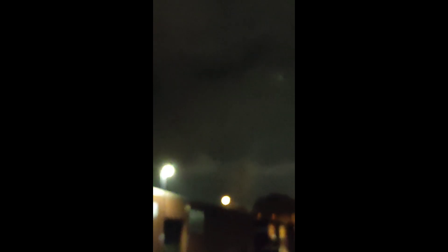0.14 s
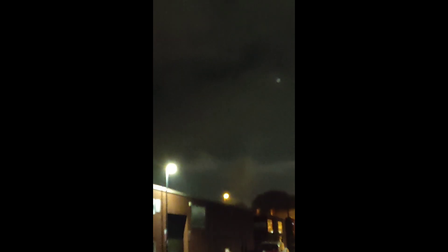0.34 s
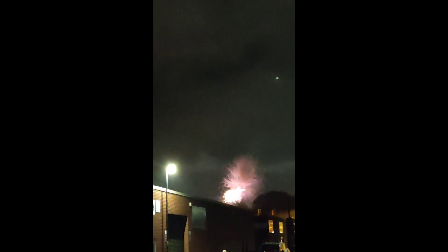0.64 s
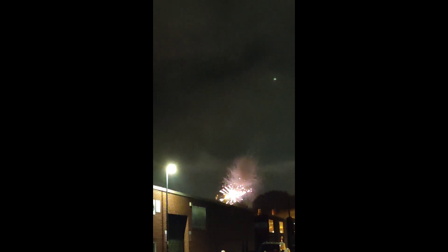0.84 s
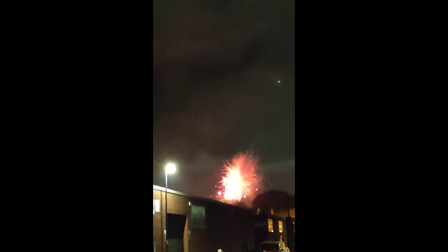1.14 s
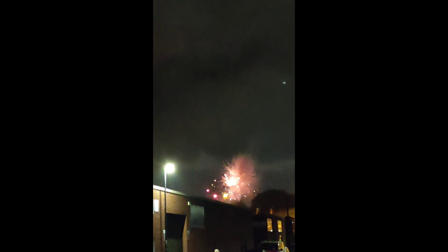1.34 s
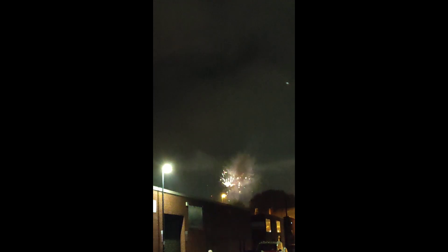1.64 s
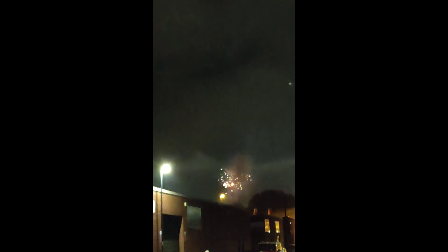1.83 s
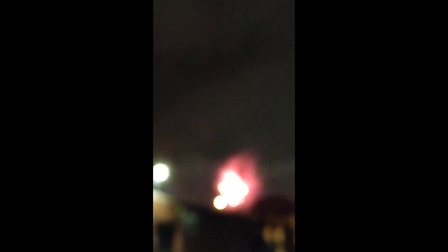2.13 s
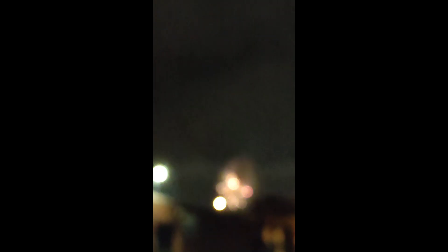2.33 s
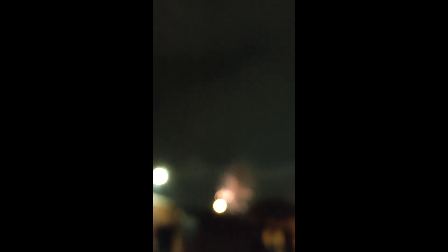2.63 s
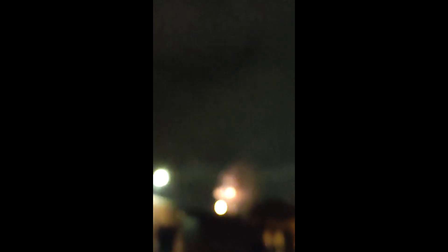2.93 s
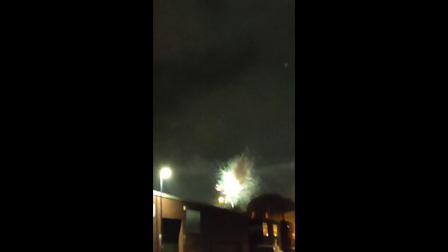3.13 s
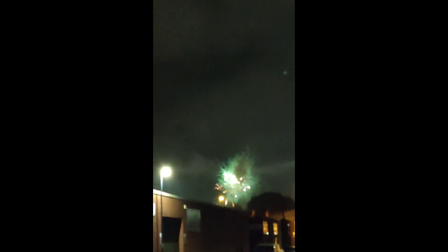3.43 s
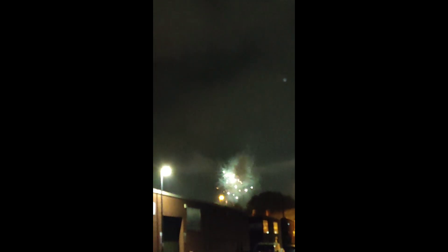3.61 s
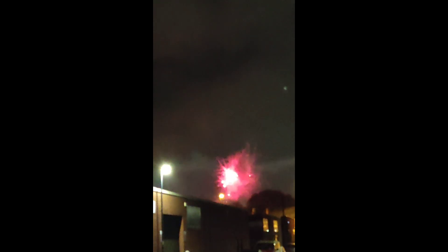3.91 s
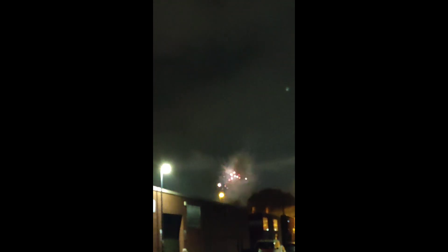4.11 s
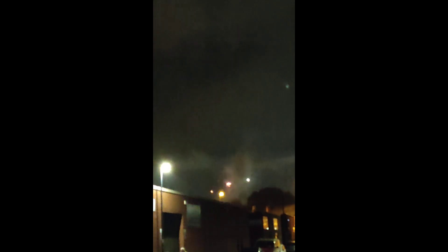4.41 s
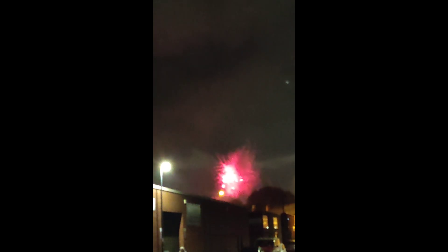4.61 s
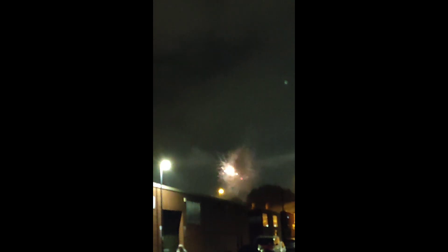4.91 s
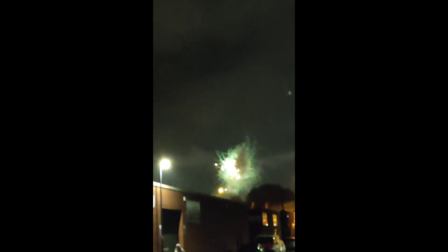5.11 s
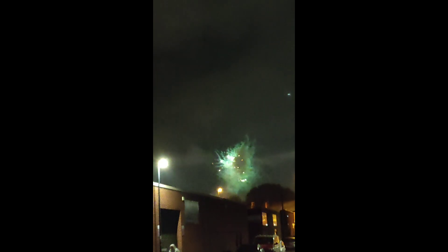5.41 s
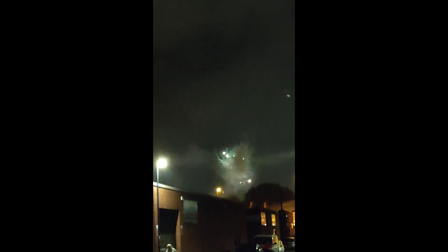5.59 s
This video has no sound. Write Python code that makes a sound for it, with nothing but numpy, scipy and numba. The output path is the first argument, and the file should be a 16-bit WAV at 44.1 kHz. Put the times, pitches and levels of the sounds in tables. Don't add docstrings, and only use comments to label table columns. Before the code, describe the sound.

Fireworks burst over a town at night with hard bangs, echoes off houses and crackling stars, above a low idling engine.

```python
import sys
import numpy as np
from scipy import signal
from scipy.fft import rfft, irfft, next_fast_len
from scipy.io import wavfile
from scipy.ndimage import uniform_filter1d, map_coordinates
from numba import njit

SR = 44100
rng = np.random.default_rng(int(sys.argv[2]) if len(sys.argv) > 2 else 0)


def log_audio(samples):
    frames = np.atleast_2d(samples).T
    limited = np.clip(frames, -1, 1)
    pcm = np.round(limited * 32767).astype(np.int16)
    wavfile.write(sys.argv[1], SR, pcm)


def how_loud(loudness_db):
    steps = np.asarray(loudness_db, float) / 20
    return 10 ** steps


N = 253575

# (time [s], peak [dB], overpressure [ms], echo strength
# [dB])
BIG_SHELLS = [
    (1.4376, -3.5, 0.34, 3),
    (1.4612, -0.5, 0.48, -1),
    (1.9545, -4, 0.4, 2),
    (2.784, -2.5, 0.36, 2),
    (3.4281, -3.5, 0.37, 3.5),
    (3.878, -3.5, 0.43, 2.5),
    (4.5938, -3, 0.42, 2.5),
    (5.3365, -3.5, 0.42, 3.5),
]
# (delay [ms], left level [dB], right level [dB])
CLOSE_WALLS = [
    (.5, -16, -10),
    (2.1, -21, -10),
    (3.25, -28, -14),
    (4.45, -30, -15),
    (5.0, -22, -22),
]
# (delay [ms], level [dB], spread [ms])
HOUSE_ROWS = [(13.15, -16.5, 1.2), (24, -9, 9.6), (44.8, -14.5, 2.7), (47.3, -37, 6.6), (60.6, -59, 0.67),
              (76.8, -17, 2.4), (89.7, -24, 1.4), (101, -15, 13), (129, -28, 7.6), (156, -23, 23),
              (165, -48, 3.7), (181, -29, 7.4), (188.4, -26, 0.78), (252, -34, 0.43), (259.4, -28, 1.2),
              (268, -32, 6.3)]
# (frequency [Hz], gain [dB])
ROOF_AIR = [(60, -5), (200, -5), (1000, -5), (3000, -3), (7000, -6.5), (14000, 9.5)]
# (time [s], peak [dB], overpressure [ms], ground echo
# delay [ms])
SMALL_CHARGES = [(0.0084, -15.5, 0.34, 1.46), (0.0179, -22.8, 0.26, 1.43), (0.5135, -12.5, 0.28, 0.86),
                 (0.5412, -24, 0.38, 1.12), (0.9038, -17, 0.35, 1.5), (1.2257, -14, 0.31, 1.6),
                 (1.6722, -13, 0.35, 1.44), (2.195, -14, 0.29, 1.34), (2.2186, -12, 0.3, 0.74),
                 (2.3357, -19.5, 0.32, 0.93), (2.5125, -14, 0.35, 1.5), (2.7109, -16.0, 0.32, 1.4),
                 (3.5259, -19, 0.48, 1.64), (3.5415, -12, 0.31, 1.27), (3.8098, -25.7, 0.33, 1.56),
                 (4.1375, -30, 0.39, 2.3), (4.1656, -13, 0.34, 1.67), (4.1852, -16.5, 0.32, 1.15),
                 (4.2089, -25, 0.44, 1.3), (4.635, -41, 0.44, 1.7), (4.974, -16.5, 0.29, 1.52),
                 (5.4037, -13, 0.33, 1.5), (5.4919, -16.5, 0.2, 1.44)]
# (delay [ms], level under the shell [dB], overpressure [ms], ground echo delay [ms])
HOUSE_FRONTS = [
    (14, -13, 0.45, 1.48),
    (79, -25.5, 0.067, 1.17),
    (103, -16, 0.6, 1.56),
    (182, -56, 0.42, 1.702),
]
# (delay [ms], peak [dB])
TALL_WALL = [
    (47, -40),
    (47, -40),
    (22.3, -20),
    (24.3, -6),
    (27.9, -16.5),
    (27.3, -8),
    (23.5, -14),
    (24.7, -11),
]
# (time [s], peak [dB])
CLEAR_STARS = [(0.1374, -20.5), (0.2131, -24), (0.2775, -24.5), (0.3458, -21), (0.3823, -55),
               (0.4196, -26.5), (0.4459, -24), (0.7611, -26), (1.8204, -20), (1.8945, -23.5), (1.9154, -30),
               (2.1732, -27), (2.4605, -21.5), (2.564, -19.5), (2.6066, -18.5), (2.6407, -20.5),
               (2.7399, -19), (3.1651, -24), (3.2322, -25), (3.2936, -24), (3.3349, -22), (3.3769, -23),
               (5.0578, -17), (5.1019, -19), (5.151, -17), (5.2102, -20.5), (5.2594, -16.5), (5.315, -22),
               (5.5967, -21.5), (5.7389, -22)]
# (time [s], peak [dB])
MORE_STARS = [(5.0117, -26), (5.0237, -22), (5.048, -26), (5.0965, -36), (5.1194, -23), (5.1284, -22),
              (5.1456, -20), (5.158, -25), (5.1727, -21), (5.1806, -22), (5.1952, -21.5), (5.205, -20.5),
              (5.2285, -25), (5.236, -20.5), (5.2692, -22), (5.2795, -18), (2.3929, -26.5), (2.771, -16),
              (2.5933, -23), (2.6876, -23.5), (2.7184, -23), (3.2573, -23.5), (3.3639, -27),
              (3.688, -22.5), (0.8313, -30), (1.1052, -30), (1.181, -35), (1.307, -34), (4.2586, -25.5),
              (4.835, -19)]
# (burst time [s], roll level [dB], star shower level [dB])
LEFT_BEHIND = [
    (-0.24, -29.5, -42),
    (0.3, -66, -48.5),
    (1.45, -28, -39),
    (1.955, -32.5, -43),
    (2.784, -31, -46.5),
    (3.43, -33.5, -66),
    (3.878, -33, -74),
    (4.594, -33, -42),
    (5.336, -32, -44.5),
]
# (frequency [Hz], level [dB per Hz])
ROLL_COLOUR = [(200, -27), (320, -1), (600, 0), (1000, -0.5), (1600, -7), (3000, -34.5), (6000, -35),
               (10000, -35.5)]
# (frequency [Hz], level [dB per Hz])
SWARM_COLOUR = [(700, -30), (1200, -5), (2000, -11), (3200, -1.5), (4500, -20), (7000, -21), (9000, -35),
                (14300, -42)]
# (frequency [Hz], likeness [0 to 1])
LIKENESS = [(60, 0.85), (180, 0.96), (550, 0.96), (1650, 0.31), (4970, 0.062), (15000, 1)]
# (time [s], firing rate [Hz])
IDLE_SPEED = [(0.0, 27.08), (0.53, 26.35), (1.31, 27.49), (1.41, 26.44), (1.58, 27.13), (2.35, 26.31),
              (3.68, 26.76), (3.92, 26.34), (4.82, 27.58), (5.75, 26.9)]
# (multiple of the firing rate [-], level [dB])
ENGINE_TONES = [(1, -2), (2, -3.5), (3, 2), (4, -5.5), (5, -24), (6, -2.5), (7, 0.5), (8, -5.5), (9, -55),
                (10, -15)]
# (frequency [Hz], level [dB per Hz])
EXHAUST_COLOUR = [(20, -43), (40, -2), (62, -15), (80, -13), (130, -7), (190, -4.5), (260, -11.5),
                  (500, -25.5), (1000, -59.5)]
# (time [s], firing rate [Hz], level [dB])
FAR_VEHICLE = [
    (0, 46, -50),
    (1.5, 35.9, -63),
    (2.6, 29.5, -66),
    (3.5, 31.55, -50),
    (5.75, 43.4, -41),
]
# (frequency [Hz], width [Hz], level [dB])
PORT_CAVITIES = [
    [(1600, 150, -20), (7300, 1500, 2.5)],
    [(2010, 320, 0), (5200, 2500, -3)],
]
# (frequency [Hz], gain [dB])
MIC_ROLLOFF = [(7600, 0.5), (9000, -13.5), (11000, -26), (14000, -26)]
# (frequency [Hz], level [dB per Hz])
HISS_COLOUR = [(1200, -6), (2000, -5.5), (3200, -6), (4300, -24), (5500, -26), (7500, -10), (9000, -22),
               (14300, -21.5)]


def shells():
    direct, echoes = np.zeros(N + SR), np.zeros((2, N + 2 * SR))
    for s, db, ms, echo_db in BIG_SHELLS:
        wave = how_loud(db + 7) * blast(1.15 * ms, fade=2.5, ground_ms=rng.normal(1.52, .03),
                                   ground_db=rng.normal(-4, 1), rise=.16)
        at = round(s * SR)
        direct[at:at + len(wave)] += wave
        aloft = how_loud(db + 8) * blast(ms, fade=2.5, ground_ms=0, ground_db=-60, rise=.16)
        answer = signal.fftconvolve(aloft[None], town(tail_db=-27, t60=1.73, dull_hz=6800), axes=1)
        echoes[:, at:at + answer.shape[1]] += how_loud(echo_db - 21.0) * answer
    return filtered(direct[:N], nearby) + echoes[:, :N]


def blast(ms, fade, ground_ms, ground_db, rise):
    t = np.arange(300) / SR * 1000

    def jump(t, ms, rise):
        front = 1 - np.exp(-(t / (rise * ms)) ** 2)
        swing = np.cos(np.pi * t / (2 * ms))
        return front * swing * np.exp(-t / (fade * ms)) * (t < 3 * ms)

    ground = jump(np.maximum(t - ground_ms, 0), .8 * ms, .6 * rise)
    wave = jump(t, ms, rise) + how_loud(ground_db) * ground
    return wave / wave.max()


def nearby(hz):
    delay = lambda ms: np.exp(-2j * np.pi * hz * ms / 1000)
    direct = np.array([delay(0), delay(0.087)])
    return direct + sum(how_loud([[left], [right]]) * delay(ms) for ms, left, right in CLOSE_WALLS)


def town(tail_db, t60, dull_hz):
    t = np.arange(SR) / SR * 1000
    rows = sum(how_loud(db) * np.exp(-((t - ms) / width) ** 2) / np.sqrt(width) for ms, db, width in HOUSE_ROWS)
    tail = how_loud(tail_db - 60 * t / 1000 / t60) * (1 - np.exp(-t / 8))
    facets = rng.standard_normal((2, SR)) * how_loud(3.5 * rng.standard_normal(SR))
    return filtered(spread((rows + tail) * facets), lambda hz: 1 / (1 + 1j * hz / dull_hz))


def pops():
    direct, t = np.zeros(N + SR), np.arange(400) / SR
    rows = small_blasts()
    for (s, db, ms, ground_ms), sparks in zip(rows, rng.standard_normal((len(rows), len(t)))):
        size = min(ms / .27, 1.3)
        ground_db = -7 if ground_ms > .95 else -12
        wave = how_loud(db + 3.5) * blast(ms * size ** .6, fade=4, ground_ms=ground_ms,
                                     ground_db=ground_db, rise=.45 * size)
        spitting = how_loud(-30 - 60 * t / .025) * sparks * (.2 / ms)
        wave = np.convolve(wave, np.r_[1, spitting])
        direct[round(s * SR):][:len(wave)] += wave
    direct = filtered(direct, lambda hz: (1j * hz / (300 + 1j * hz)) ** 2 / (1 + 1j * hz / 6000))
    echoes = signal.fftconvolve(direct[None], town(tail_db=-42.0, t60=0.95, dull_hz=4000), axes=1)
    return filtered(direct[:N], nearby) + how_loud(-23) * echoes[:, :N]


def small_blasts():
    slaps = [(s + late / 1000, db + under_db + 1.5 * rng.normal(), ms, ground)
             for s, db, *_ in BIG_SHELLS for late, under_db, ms, ground in HOUSE_FRONTS]
    tall = [(shell[0] + late / 1000, db, 0.33, 1.12) for shell, (late, db) in zip(BIG_SHELLS, TALL_WALL)]
    return np.r_[SMALL_CHARGES, tall, slaps, stars()]


def stars():
    snaps_per_s, snap_db, snap_varies_db = 115, 11, 3
    luck = rng.standard_normal((660, 2))
    s = np.minimum((np.arange(len(luck)) + luck[:, 0]) / snaps_per_s, N / SR).clip(0)
    shower = aftermath()[1][(s * SR).astype(int).clip(0, N - 1)]
    snap_peak_db = 10 * np.log10(shower + 1e-12) + snap_db + snap_varies_db * luck[:, 1]
    s, db = np.r_[CLEAR_STARS, MORE_STARS, np.c_[s, snap_peak_db]].T
    size = rng.standard_normal((len(s), 2)).clip(-2, 2)
    blunter = .035 * np.clip(-24 - db, 0, 20)
    ms = .175 * np.exp(.18 * size[:, 0] + blunter)
    ground_ms = 1.5 + .2 * size[:, 1]
    return np.c_[s, db, ms, ground_ms]


def wash():
    roll, shower = aftermath()
    rumble_db = 10 * np.log10(roll + how_loud(2 * -45.5))
    crackle_db = 10 * np.log10(how_loud(2 * -2) * shower + how_loud(2 * -12.5) * roll + how_loud(2 * -64.5))
    colour = lambda x, points: unit(spread(filtered(x, causal(points))))
    districts = lumpy(rng.standard_normal((2, N)), depth_db=3)
    rumble = how_loud(rumble_db - 2 + 1.5 * wobble(25)) * colour(districts, ROLL_COLOUR)
    cracks = (rng.random(N) < 900 / SR) * how_loud(3 * rng.standard_normal(N))
    swarm = unit(cracks) * rng.standard_normal((2, N)) + rng.standard_normal((2, N))
    return rumble + how_loud(crackle_db - 3 + 2 * wobble(60)) * colour(swarm, SWARM_COLOUR)


def aftermath():
    peak_s, roll_rise_s, t60_s = .15, .07, 1.83
    fuse_s, rise_s, shower_s, fall_s = 0.27, 0.26, 0.27, 0.14
    s, roll_db, shower_db = np.transpose(LEFT_BEHIND)[:, :, None]
    t = np.arange(N) / SR - s
    late = t - peak_s
    swell, fade = np.exp(-(late / roll_rise_s) ** 2), how_loud(-120 * np.abs(late) / t60_s)
    roll = how_loud(2 * roll_db) * np.where(late < 0, swell, fade)
    lit = t - fuse_s
    burn = np.clip(lit / rise_s, 0, 1) * np.exp(-np.maximum(lit - shower_s, 0) / fall_s)
    return roll.sum(axis=0), (how_loud(2 * shower_db) * burn).sum(axis=0)


def lumpy(x, depth_db):
    z = signal.stft(x, nperseg=256)[2]
    field = uniform_filter1d(rng.standard_normal(z.shape[1:]), size=3, axis=0)
    field = uniform_filter1d(field, size=7, axis=1)
    return signal.istft(z * how_loud(depth_db * unit(field)), nperseg=256)[1][:, :N]


def engine():
    turn = 2 * np.pi * np.cumsum(curves(IDLE_SPEED)[0]) / SR
    tones = sum(how_loud(db - 42.5 + 0.2 * wobble(4.62)) * np.sin(k * turn + 0.66 * wobble(5.5) + 1.1 * k * k)
                for k, db in ENGINE_TONES)
    exhaust = filtered(rng.standard_normal((2, N)), causal(EXHAUST_COLOUR))
    return tones + how_loud(-46.5) * unit(spread(exhaust))


def passing():
    firing_hz, db = curves(FAR_VEHICLE)
    return how_loud(db - 2 + wobble(3.5)) * np.sin(2 * np.pi * np.cumsum(firing_hz) / SR)


def along(points, hz):
    f, v = np.transpose(points)
    return np.interp(np.log(hz + 1), np.log(f + 1), v)


def curves(rows):
    s, *cols = np.transpose(rows)
    return [np.interp(np.arange(N) / SR, s, c) for c in cols]


def unit(x):
    return x / np.sqrt(np.mean(x ** 2) + 1e-20)


def wobble(rate):
    return map_coordinates(rng.standard_normal(int(N * rate / SR) + 4), [np.arange(N) * rate / SR])


def filtered(x, response):
    n = x.shape[-1]
    m = next_fast_len(n + 8192)
    return irfft(rfft(x, m) * response(np.fft.rfftfreq(m, 1 / SR)), m)[..., :n]


def causal(points):
    def response(hz):
        c = irfft(np.log(how_loud(along(points, hz))))
        c[1:len(c) // 2] *= 2
        c[len(c) // 2 + 1:] = 0
        return np.exp(rfft(c))
    return response


def spread(pair):
    turn = lambda hz: np.arccos(np.clip(along(LIKENESS, hz), -1, 1)) / 2
    mid, side = filtered(pair, lambda hz: np.array([np.cos(turn(hz)), np.sin(turn(hz))]))
    return np.array([mid + side, mid - side])


def scene():
    return filtered(shells() + pops(), causal(ROOF_AIR)) + wash() + engine() + passing()


@njit
def duck(over_db, attack, release):
    out, held, now = np.zeros(len(over_db)), 0., 0.
    for i in range(len(over_db)):
        held = max(over_db[i], held * (1 - release))
        now += (held - now) * attack
        out[i] = now
    return out


def sparse(x, from_hz, share):
    hz, _, z = signal.stft(x, SR, nperseg=512)
    field = uniform_filter1d(rng.standard_normal(z.shape[1:]), size=3, axis=0)
    field = unit(uniform_filter1d(field, size=18, axis=1))
    size = np.abs(z).mean(axis=0)
    faint = size < 4 * np.median(size, axis=1, keepdims=True)
    hole = faint & (field < np.quantile(field, share * np.clip(hz / from_hz, 0, 1) ** 4)[:, None])
    return signal.istft(z * np.where(hole, .03, 1), SR, nperseg=512)[1][:, :N]


def top_cut(x):
    return signal.sosfilt(signal.butter(12, 15620, fs=SR, output="sos"), x)


def record(dry):
    cavity = lambda f, modes: 1 + sum(how_loud(db) * 1j * f * w / (c * c - f * f + 1j * f * w) for c, w, db in modes)
    x = filtered(dry, lambda hz: np.array([cavity(hz, modes) for modes in PORT_CAVITIES]))
    over_db = np.maximum(20 * np.log10(np.abs(x).max(axis=0) + 1e-9) + 7, 0)
    x = x * how_loud(-duck(over_db, 1 / (0.0054 * SR), 1 / (.08 * SR)))
    clipped = x / (1 + np.abs(x / .8) ** 8) ** (1 / 8)
    x = filtered(clipped, causal(MIC_ROLLOFF))
    hiss = filtered(rng.standard_normal((2, N)), lambda hz: how_loud(along(HISS_COLOUR, hz)))
    x = x + how_loud(-56) * unit(hiss)
    mix = filtered(x, lambda hz: np.where(hz < 14400, 1, how_loud(-45)))
    return top_cut(mix)


dry = scene()
out = record(dry)
log_audio(out)
```